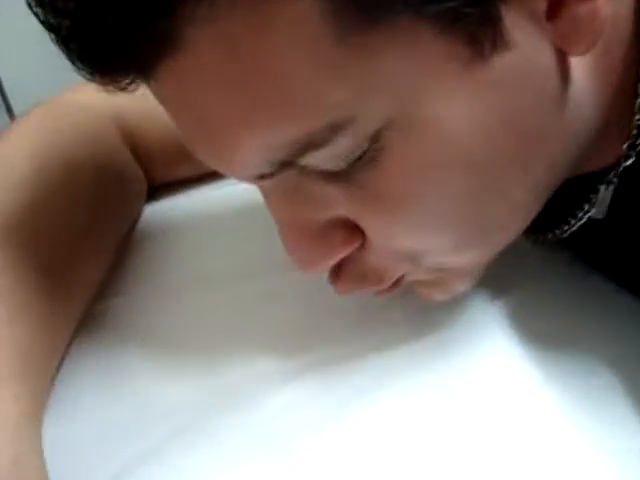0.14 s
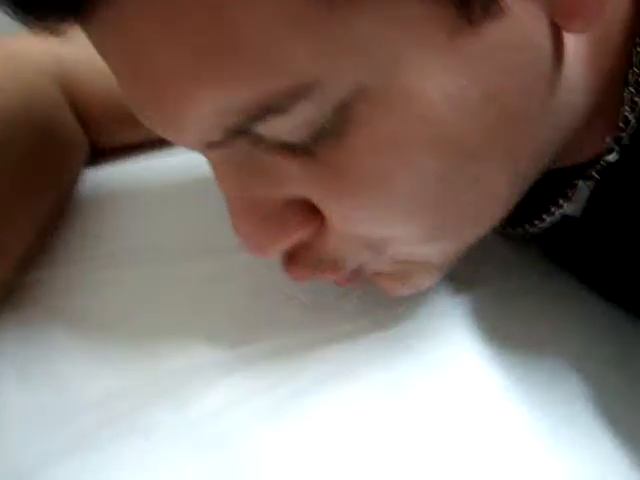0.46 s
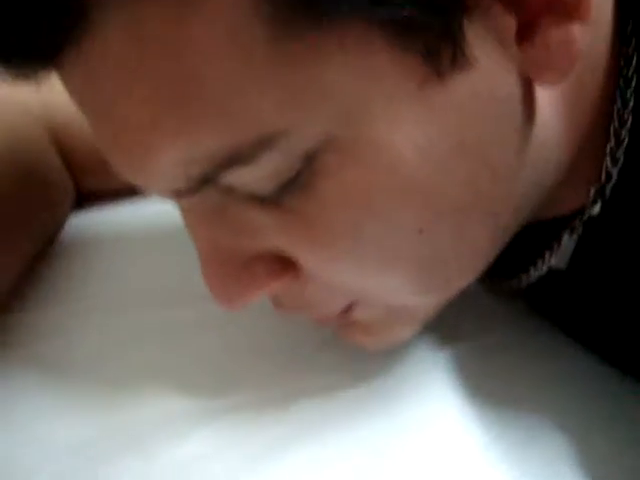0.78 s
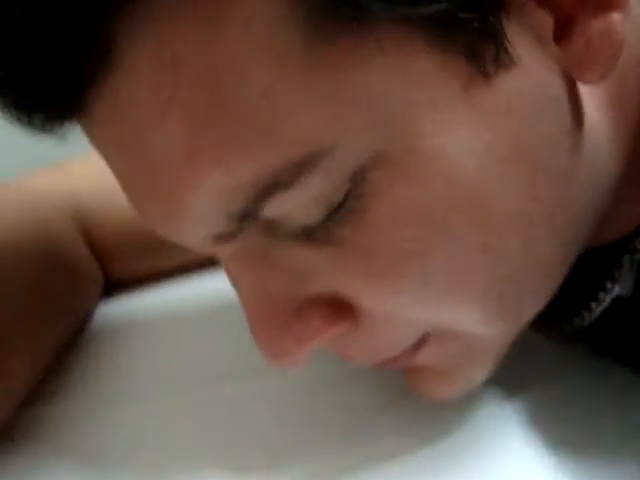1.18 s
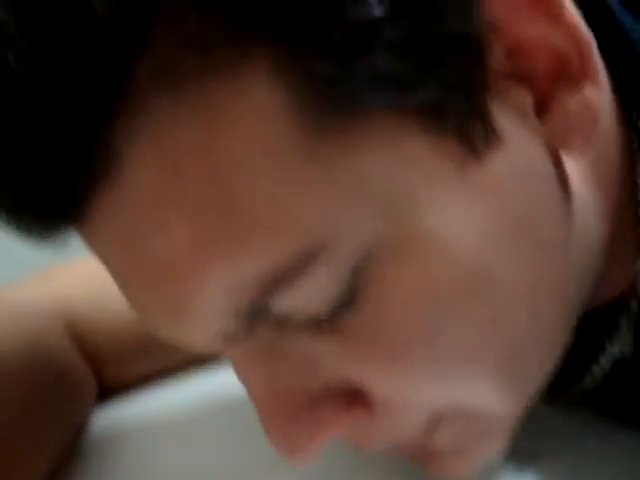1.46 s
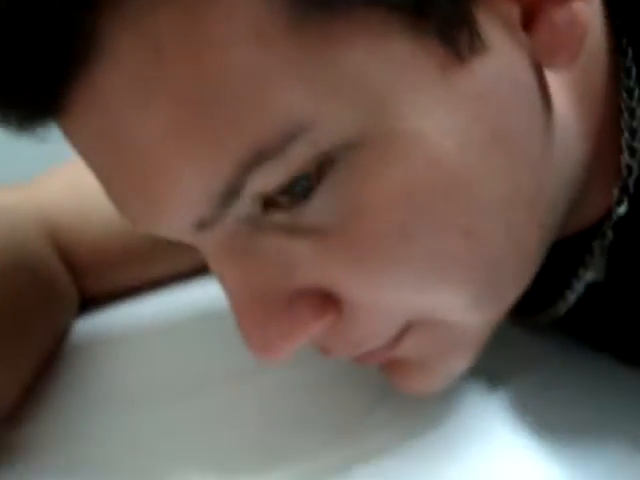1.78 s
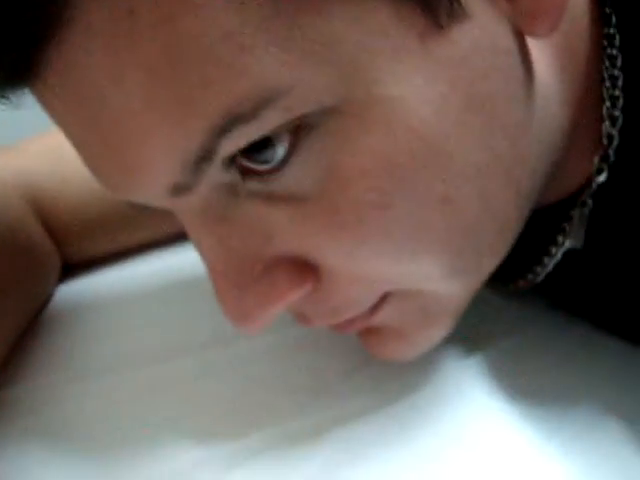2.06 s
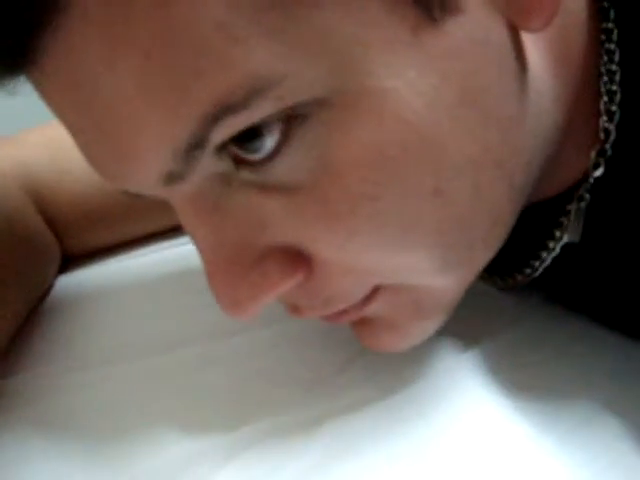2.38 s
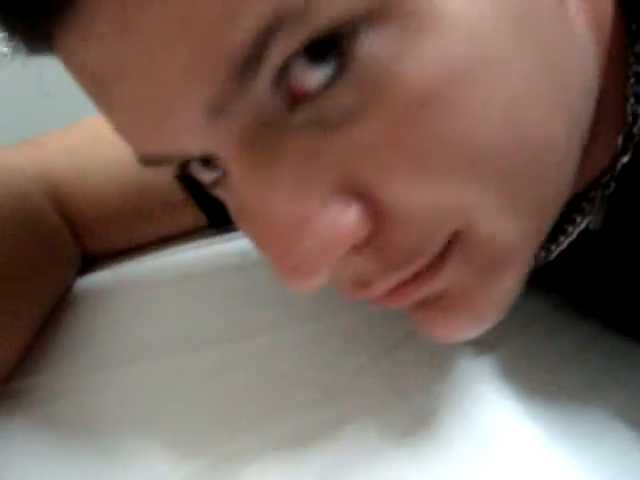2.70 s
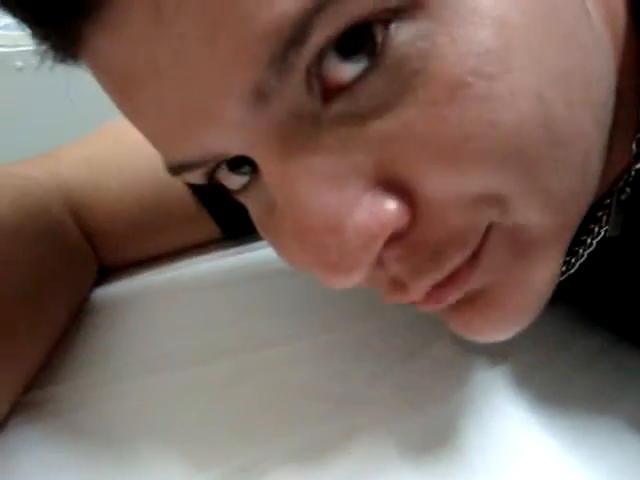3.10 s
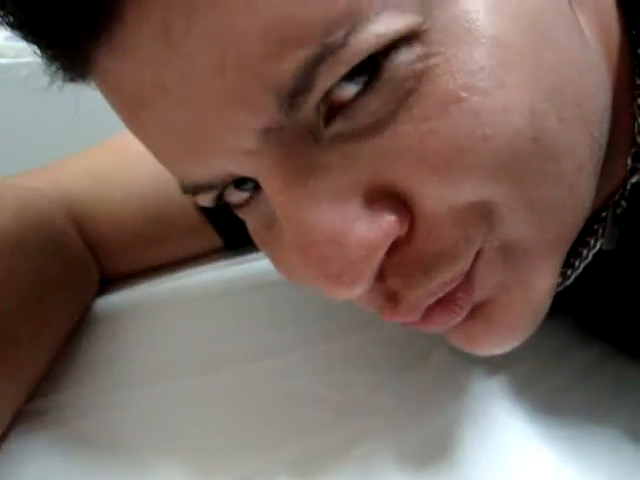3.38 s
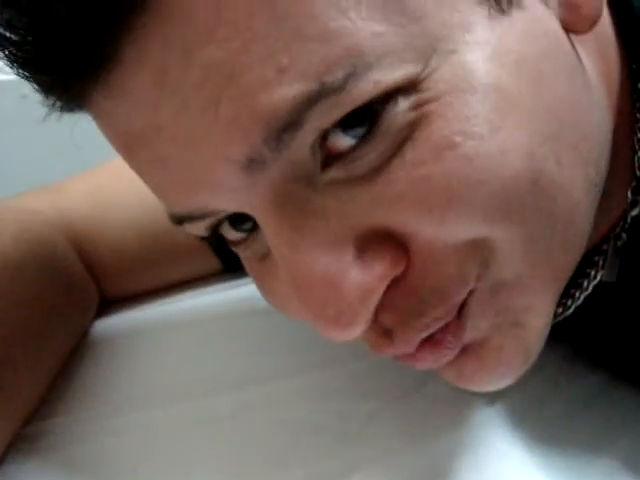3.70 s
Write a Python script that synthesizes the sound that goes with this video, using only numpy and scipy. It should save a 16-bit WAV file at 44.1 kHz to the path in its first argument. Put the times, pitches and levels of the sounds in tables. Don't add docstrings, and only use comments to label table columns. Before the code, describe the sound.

An electric tattoo machine is already buzzing close by, a rapid raspy metallic rattle with a low-pitched pulse and bright sizzle. Between about 0.7 and 2 seconds it cuts out four times, around 0.7, 0.9, 1.4 and 1.9, each dip ringing briefly in a small hard room before restarting, some with a soft thump. Dull foot-pedal clacks accompany this. Then the buzz continues steadily until the end, near 3.9 seconds.

```python
import sys
import numpy as np
from scipy import signal
from scipy.fft import rfft, irfft, next_fast_len
from scipy.io import wavfile

SR = 44100
rng = np.random.default_rng(int(sys.argv[2]) if len(sys.argv) > 2 else 0)


def level_to_linear(level):
    exponent = np.asarray(level, float) / 20
    return 10 ** exponent


def store_pcm(level_fs):
    pcm = np.round(np.clip(level_fs, -1, 1) * 32767).astype(np.int16)
    wavfile.write(sys.argv[1], SR, np.atleast_2d(pcm).T)


N = 169785

# (t/s, nearness level/dB, low frame level/dB, needle tube level/dB)
STROKE_WORK = [(0, -33.5, -6.5, -11), (.42, -33.5, -15, -13), (.6, -30.5, -18.5, -9), (.7, -33, -15, -10),
               (.9, -35.5, -19, -9), (1.15, -33, -20, -14.5), (1.41, -34, -14.5, -14),
               (1.6, -33, -17.5, -18), (1.7, -34.5, -15, -14), (1.9, -32, -17, -12.5),
               (2.05, -32, -15, -11.5), (2.24, -31, -12.5, -7.5), (2.36, -30, -20, -17),
               (2.83, -26, -21, -18.5), (2.9, -30.5, -18.5, -14), (3.07, -29, -23, -10),
               (3.12, -29.5, -21, -7.5), (3.85, -28, -23.5, -10)]


def machine():
    near_db, low_db, tube_db = follow(STROKE_WORK)
    drive, thump, lag_hz = swing()
    steady, uneven = contacts(lag_hz)
    buzz = sizzle() + metalwork(steady, uneven, low_db, tube_db)
    return buzz * drive * level_to_linear(near_db), coil_thump(steady[0] + .5 * uneven[0], thump, drive)


# (f/Hz, level/dB, t60/s)
COIL_CORE = [(1068, 0, .05)]
GRIP_MODES = [(1351, -2, 0.012), (1666, 5, .008)]
LOW_FRAME = [(1988, -0.5, 0.0087), (2241, -1, 0.02), (2482, -26.5, 0.021)]
NEEDLE_BAR = [(2645, -6, 0.005), (2905, -1, 0.0095), (3154, -7, 0.0042), (3536, -3.5, 0.0053)]
NEEDLE_TUBE = [(4396, -2, 0.0072), (3840, -7.5, 0.0081), (4622, -5, 0.017)]
CONTACT_SPRING = [(5099, 6.5, 0.0014), (5330, -10, 0.0031), (5715, -0.5, 0.0027), (6310, -3.5, 0.005)]
HIGH_FRAME = [(6620, -2.5, 0.0032), (7010, -4, 0.0055), (7458, 0.5, 0.0025), (7946, -3, 0.0016),
              (8480, -10.5, 0.0036), (8778, -8, 0.0041), (9450, -6, 0.0037), (9863, -8.5, 0.0079)]
UNEVENNESS = .03, .03, .03, .03, .05, .15, .18
LATER_CONTACTS_DB = -20, -12, -11, -12, -14, -4, -2.5
LOOSE_RATTLE_DB = -35, -30, -24, -13, -13, -2, -.5
# (t/s, level/dB)
NEEDLE_BITE = [(0, -15), (.45, -15.5), (.6, -16), (.9, -15.5), (1.15, -18), (1.35, -14), (1.7, -18),
               (1.95, -16.5), (2.05, -21.5), (2.35, -20.5), (3.06, -24), (3.12, -15), (3.85, -20.5)]
# (t/s, upper low-frame modes level/dB, upper tube modes level/dB,
# spring level/dB, grip level/dB)
HAND_TURN = [(0, 3.5, 4, -9, -33), (.4, -1.5, 7, -4, -23), (.6, 5.5, 0, -7.5, -27.5),
             (.9, -5.5, 0, -7.5, -26.5), (1.4, -1.7, -5.8, -8, -26), (1.9, 2, -1.5, -9.5, -33),
             (2.1, 4.5, 6, -11, -24), (2.3, 2.5, 2, -11, -40), (2.6, -1.5, -7.2, -9, -31),
             (2.83, -1.5, -8, -8, -30), (2.9, 7, -7.5, -10.5, -24.5), (3.1, -2, -3.5, -10, -26),
             (3.5, -2, -5.5, -11.5, -26), (3.85, -4.5, -5, -13.5, -25.5)]


def metalwork(steady, uneven, low_db, tube_db):
    low_turn, tube_turn, spring_db, grip_db = follow(HAND_TURN)
    bite_db, = follow(NEEDLE_BITE)
    # modes, level dB, tilt dB between lower and upper modes
    parts = [(COIL_CORE, -42, 0), (GRIP_MODES, grip_db, 0), (LOW_FRAME, low_db, low_turn),
             (NEEDLE_BAR, bite_db, 0), (NEEDLE_TUBE, tube_db, tube_turn),
             (CONTACT_SPRING, spring_db, 0), (HIGH_FRAME, 0, 0)]
    rattle_per_s, rattle_db = 4000, -20.5
    rattle = (rng.random(N) < rattle_per_s / SR) * rng.standard_normal(N) * level_to_linear(rattle_db)
    colours = [level_to_linear(3.0 * drift(1.03)) for _ in range(17)]
    out = np.zeros(N)
    for part, share, later_db, loose_db in zip(parts, UNEVENNESS, LATER_CONTACTS_DB, LOOSE_RATTLE_DB):
        modes, part_db, turn_db = part
        hits = [even + share * odd for even, odd in zip(steady, uneven)]
        sound = np.zeros(N)
        for (hz, db, t60), side in zip(modes, np.linspace(-1, 1, len(modes))):
            later = sum(rng.choice([-1, 1]) * colours[rng.integers(17)] * hit for hit in hits[1:])
            blows = hits[0] + level_to_linear(later_db) * later + level_to_linear(loose_db) * rattle
            travel = (1 + rng.uniform()) * 5 / hz
            blows = np.roll(blows, int(travel * SR))
            facing_db = 2.0 * drift(2.5) * (hz > 5000)
            sound = sound + level_to_linear(db + side * turn_db + facing_db) * swell(blows, hz, t60)
        below = signal.butter(4, 0.55 * modes[0][0], "high", fs=SR, output="sos")
        out = out + rms_one(signal.sosfilt(below, sound)) * level_to_linear(part_db)
    return out


# (t/s, stroke rate f/Hz)
STROKE_RATE = [(0.0, 105.2), (0.43, 105.9), (0.59, 107.1), (0.81, 107.2), (0.86, 105), (0.9, 106.8),
               (1.14, 106.6), (1.25, 107.6), (1.53, 107.7), (1.56, 106.1), (1.66, 107.4), (1.99, 107),
               (2.0, 106), (2.12, 107), (2.8, 107.8), (3.18, 106.4), (3.8, 105.8), (3.85, 105.8)]
# (place in the stroke 0-1, level/dB, timing scatter/us)
STROKE_CONTACTS = [
    (0, 0, 3),
    (.56, -4, 6),
    (.82, -3, 8),
    (.27, -10, 12),
    (.42, -10, 12),
]


def contacts(lag_hz):
    t = np.arange(N) / SR
    rate_hz, = follow(STROKE_RATE)
    turns = np.cumsum(rate_hz - lag_hz) / SR
    strokes = np.arange(-1, int(turns[-1]) + 1)
    index = (np.interp(strokes, turns, t) * SR).astype(int)
    steady, uneven = [], []
    for place, db, scatter_us in STROKE_CONTACTS:
        draw = rng.standard_normal((len(strokes), 2))
        at = strokes + .8 + place + .004 * place * drift(1.15)[index]
        when = np.interp(at, turns, t) + 1e-6 * scatter_us * draw[:, 0]
        size = level_to_linear(db) * ((at > turns[0]) & (at < turns[-1]))
        steady.append(clicks_at(when, size))
        uneven.append(clicks_at(when, size * draw[:, 1]))
    return steady, uneven


# (off t/s, on t/s, start-up thump level/dB)
CURRENT_CUTS = [
    (0.731, 0.817, -64),
    (0.937, 1.086, -61.5),
    (1.428, 1.536, -64),
    (1.923, 1.991, -84),
]


def swing():
    coast_s, spin_up_s = 0.045, .011
    thump_late_s, thump_s = 0.018, 0.14
    start_lag_hz, settle_s = 0.3082, 0.0606
    t = np.arange(N) / SR
    drive, thump, lag_hz = np.ones(N), np.zeros(N), np.zeros(N)
    for off, on, thump_db in CURRENT_CUTS:
        since = np.clip(t - on, 0, None)
        coast = np.exp(-np.clip(t - off, 0, None) / coast_s)
        rise = 1 - np.exp(-since / spin_up_s)
        drive *= np.maximum(coast, rise)
        thump += level_to_linear(thump_db) * (since > thump_late_s) * np.exp(-(since / thump_s) ** 2)
        lag_hz += start_lag_hz * (since > 0) * np.exp(-since / settle_s)
    return drive, thump, lag_hz


# (f/Hz, level/dB per Hz)
SPARK_HISS = [(700, -55), (1300, -30), (2500, -22), (3600, -17.5), (5800, -13), (7140, 0), (8700, -5),
              (10000, -8), (13000, -40)]


def sizzle():
    return level_to_linear(-12) * coloured(SPARK_HISS)


def coil_thump(blows, thump, drive):
    low = signal.sosfilt(signal.butter(2, [70, 432], "band", fs=SR, output="sos"), blows)
    hum = level_to_linear(-76 + 3.7 * drift(7.1)) * drive
    return rms_one(low) * (thump + hum)


# (t/s, peak level/dB, f/Hz)
SWITCH_CLACKS = [
    (0.151, -51.5, 700),
    (0.81, -47.5, 810),
    (0.885, -57, 913),
    (1.065, -40.5, 820),
    (1.343, -48.5, 870),
    (1.536, -51, 800),
    (1.847, -50.5, 865),
    (1.987, -47.5, 785),
    (2.046, -56, 825),
    (2.372, -60, 942),
]


def switch():
    knock_s, knock_n = 0.026, 1800
    pedal = [(1, 1, .022), (1.184, -level_to_linear(-4.5), .022), (1.63, level_to_linear(-8.5), .022), (2.6, level_to_linear(-5), .014)]
    out = np.zeros(N)
    for s, db, hz in SWITCH_CLACKS:
        knock = np.full(N, 1e-18)
        i = int(s * SR)
        fade = np.exp(-np.arange(knock_n) / SR / knock_s)
        knock[i:i + knock_n] = rng.standard_normal(knock_n) * fade / 14
        clack = sum(gain * ring(knock, ratio * hz, t60) for ratio, gain, t60 in pedal)
        out += level_to_linear(db + 5.5) * clack
    return signal.sosfilt(signal.butter(2, 550, "high", fs=SR, output="sos"), out)


def room(x):
    t60_s, wall_cut_hz = .55, 12000
    size = next_fast_len(N + SR)
    w = 2 * np.pi * np.arange(size // 2 + 1) / size
    dull = 1 / (1 + 1j * w * SR / (2 * np.pi * wall_cut_hz))
    echoes = 0
    for k, lag in enumerate(rng.uniform(.012, .055, 28) * SR):
        fade = level_to_linear(-60 * lag / SR / t60_s)
        loop = fade * np.abs(dull) ** (lag / 1000) * np.exp(-1j * w * lag)
        echoes = echoes + (-1) ** k * loop / (1 - loop)
    echoes = echoes / np.sqrt(np.mean(np.abs(echoes) ** 2))
    return irfft(rfft(x, size) * echoes, size)[:N]


# (f/Hz, level/dB)
ROOM_AIR = [(18, -54.5), (30, -25), (166, -19), (330, -14.5), (622, -14.5), (988, -8.5), (1130, -10),
            (1800, -11.5), (2600, -11.5), (5500, -13), (7500, -49)]


def air():
    return level_to_linear(-54) * coloured(ROOM_AIR)


def follow(table):
    s, *columns = np.transpose(table)
    return [np.interp(np.arange(N) / SR, s, column) for column in columns]


def rms_one(x):
    return x / np.sqrt(np.mean(x ** 2) + 1e-20)


def drift(rate):
    r = np.exp(-128 * np.pi * rate / SR)
    slow = signal.lfilter([1], [1, -2 * r, r * r], rng.standard_normal(N // 64 + 1502))[1500:]
    return np.interp(np.arange(N) / 64, np.arange(len(slow)), rms_one(slow))


def clicks_at(s, size):
    at, out = s * SR + 8, np.full(N + 64, 1e-18)
    taps = np.floor(at)[:, None] + np.arange(-7, 9)
    d = taps - at[:, None]
    pulse = size[:, None] * np.sinc(d) * np.cos(np.pi * d / 16) ** 2
    np.add.at(out, np.clip(taps, 0, N + 63).astype(int), pulse)
    return out[8:N + 8]


def ring(clicks, hz, t60):
    r, w = level_to_linear(-60 / (t60 * SR)), 2 * np.pi * hz / SR
    return signal.lfilter([0, np.sin(w)], [1, -2 * r * np.cos(w), r * r], clicks)


def swell(clicks, hz, t60):
    return 2 * np.e * np.log(1000) / (t60 * SR) * ring(ring(clicks, hz, t60), hz, t60)


def coloured(points):
    hz = np.arange(N // 2 + 1) * SR / N + 1
    point_hz, point_db = np.transpose(points)
    shape = np.interp(np.log(hz), np.log(point_hz), point_db)
    return rms_one(irfft(rfft(rng.standard_normal(N)) * level_to_linear(shape), N))


def scene():
    buzz, thump = machine()
    near = buzz + switch()
    return (near + level_to_linear(-9) * room(near) + thump + air())[None]


def band_limit(x):
    return signal.sosfilt(signal.butter(12, 11330, fs=SR, output="sos"), x)


def record(dry):
    miked = signal.sosfilt(signal.ellip(14, .2, 90, 10050, fs=SR, output="sos"), dry)
    return band_limit(miked)


dry = scene()
out = record(dry)
store_pcm(out)
```